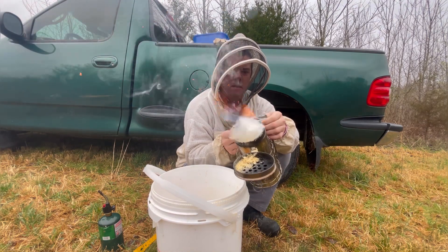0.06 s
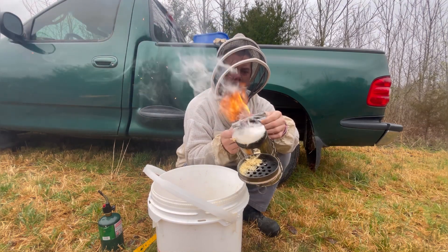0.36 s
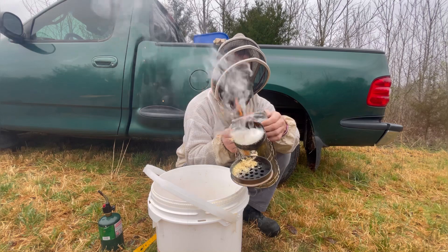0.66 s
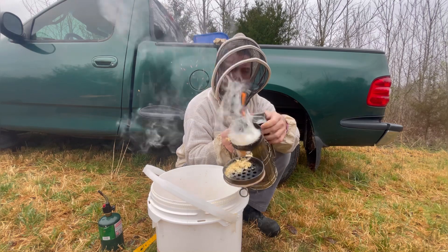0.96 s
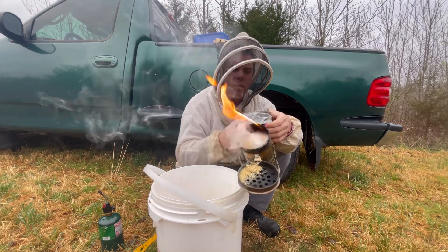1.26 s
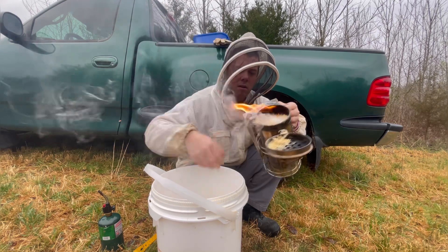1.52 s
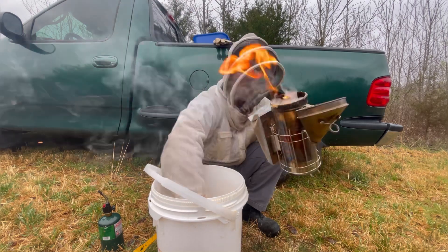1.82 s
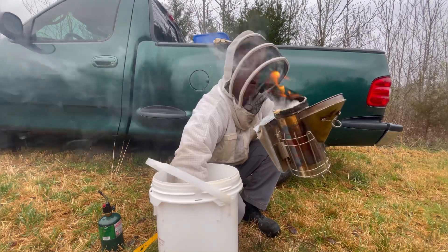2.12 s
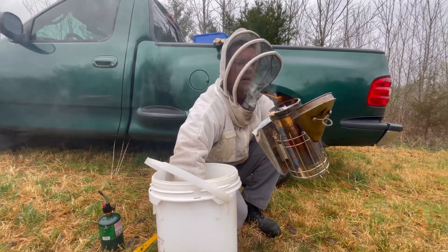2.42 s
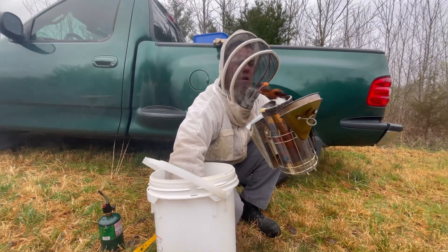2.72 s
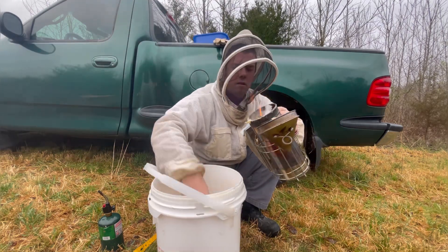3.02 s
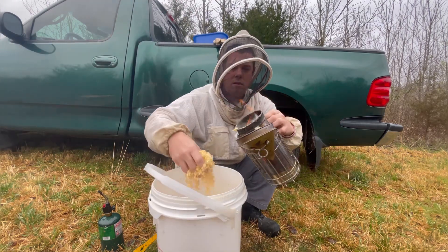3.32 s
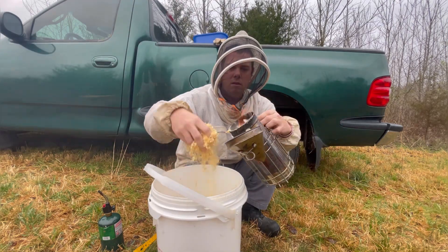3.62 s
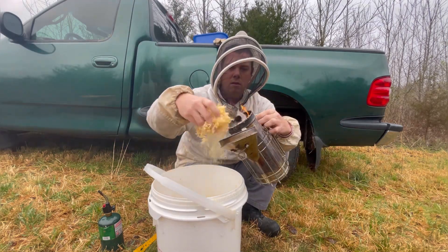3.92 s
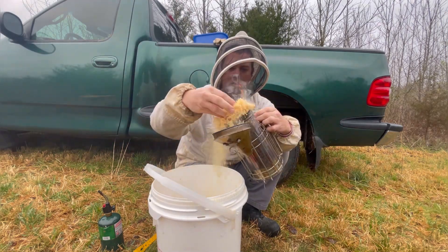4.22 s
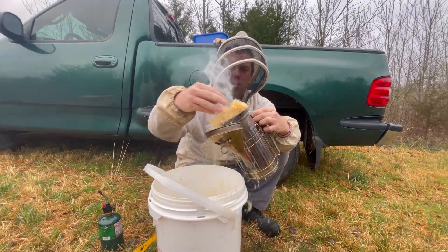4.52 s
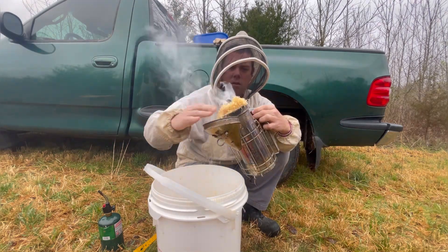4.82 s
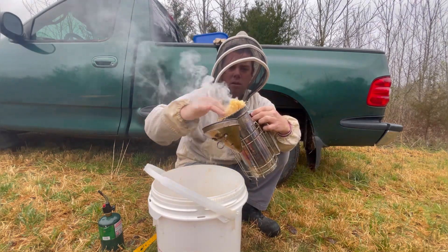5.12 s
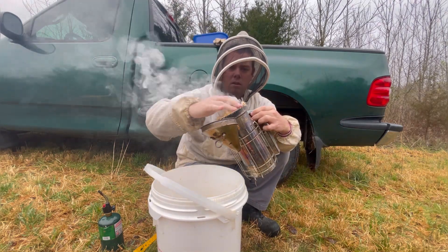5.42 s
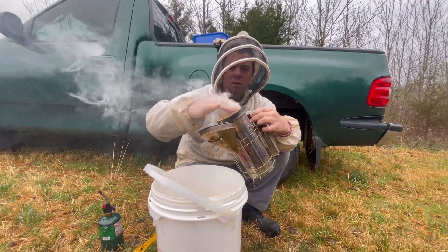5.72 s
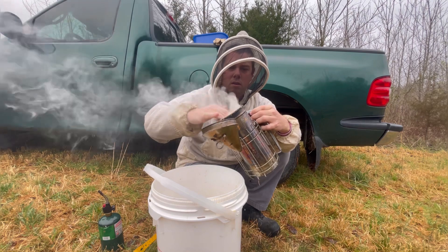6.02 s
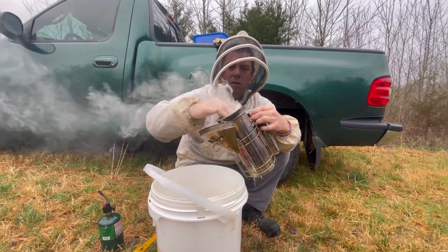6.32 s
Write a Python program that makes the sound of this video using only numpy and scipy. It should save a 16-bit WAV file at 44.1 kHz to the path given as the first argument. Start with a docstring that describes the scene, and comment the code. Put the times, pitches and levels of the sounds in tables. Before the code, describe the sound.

Close by outdoors, the bellows of a bee smoker puff three times in quick succession, each rush of air followed by a low flare of fire. The metal can and its lid clink and knock. A hand then softly scoops dry wood shavings from a plastic bucket, lets some patter back and presses the rest into the can. The lid drops shut with a short ring. Distant traffic rumbles throughout.

```python
"""Outdoors, close to a bee smoker being lit, in stereo from a microphone with two ports.
Three quick squeezes of the bellows blow air through the fire, which flares after each. The tin can and
its hinged lid clink and ring; a hand scoops dry wood shavings from a plastic bucket and packs them in,
and the lid drops shut. In the distance, traffic rumbles under a faint hiss of open air."""
import sys
import numpy as np
from scipy import signal
from scipy.fft import rfft, irfft
from scipy.io import wavfile
from scipy.ndimage import map_coordinates

SR = 44100
rng = np.random.default_rng(int(sys.argv[2]) if len(sys.argv) > 2 else 0)


def materialize(psi):
    """Save the field psi as 16-bit PCM at rate SR to the path in sys.argv[1].

    A 1-D psi becomes a single channel; in a 2-D psi each row is a channel.
    """
    bounded = np.clip(np.atleast_2d(psi).T, -1, 1)
    quanta = np.round(bounded * 32767).astype(np.int16)
    wavfile.write(sys.argv[1], SR, quanta)


N = 280514

# How alike the ports hear near and diffuse sound. Each row: frequency in Hz, likeness from -1 to 1.
NEAR = [(250, 1), (700, 0.85), (1600, 0.85), (3500, 0.73), (8500, 0.12), (10000, 1), (13000, 1)]
DIFFUSE = [(120, 0.91), (260, 0.76), (430, -0.31), (620, 1), (800, 0.18), (1100, -0.84), (2000, 0.24),
           (3000, -0.12), (8500, 0.26), (10000, 0.98), (13000, 1)]
# Spectra of an airy hiss, a crisp rustle and a soft rustle. Each row: frequency in Hz, relative dB.
AIRY_HISS = [(200, 5.5), (600, -1), (1000, 0), (1600, 2.5), (2400, -5), (3300, -11), (7000, -17.5),
             (13000, -31.5)]
CRISP_RUSTLE = [(800, -22), (2000, 2), (3000, -2), (4000, -2), (5600, 1), (7500, 0.5), (11000, 2),
                (12000, -9.5), (13000, -22)]
SOFT_RUSTLE = [(300, 12.5), (650, -4.5), (1100, 5), (2200, 1), (4000, 0.5), (6500, -2.5), (9000, -1.5),
               (11000, -7.5), (13000, -23)]


def from_db(db):
    """Decibels to gain."""
    return 10 ** (np.asarray(db) / 20)


def rms_one(x):
    """Scale to unit power."""
    return x / np.sqrt(np.mean(x ** 2) + 1e-20)


def in_time(rows):
    """Each column of a curve, sample by sample."""
    s, *columns = np.transpose(rows)
    return [np.interp(np.arange(N) / SR, s, c) for c in columns]


def per_bin(points):
    """A table over log frequency, read at every Fourier bin."""
    hz, value = np.transpose(points)
    return np.interp(np.log(np.arange(N // 2 + 1) * SR / N + 1), np.log(hz), value)


def white():
    """Two unrelated white noises."""
    return rng.standard_normal((2, N))


def colour(pair, spectrum, likeness):
    """Two unrelated signals become left and right, rms 1. Each spectrum row: Hz, relative dB."""
    mid, side = rfft(pair) * from_db(per_bin(spectrum))
    alike = np.clip(per_bin(likeness), -.995, .995)
    return rms_one(irfft(np.sqrt(1 + alike) * mid + np.sqrt(1 - alike) * side * [[1], [-1]], N))


def resonate(x, resonances):
    """Lift the sound round each resonance. Each row: centre in Hz, width in Hz, boost in dB."""
    return x + sum((from_db(db) - 1) * signal.lfilter(*signal.iirpeak(hz, hz / width, fs=SR), x)
                   for hz, width, db in resonances)


def drift(rate):
    """A random wander of rms 1 that changes course rate times a second."""
    knots = rng.standard_normal(8192)
    return rms_one(map_coordinates(knots, [np.arange(N) / SR * rate], order=1, mode="wrap"))


def swell(s, half_s):
    """A bell-shaped rise and fall."""
    return np.exp(-.5 * ((np.arange(N) / SR - s) / half_s) ** 2)


def held(start_s, end_s, attack_s, release_s):
    """A smooth rise to one, a hold and an exponential release."""
    t = np.arange(N) / SR
    return np.exp(-(np.maximum(start_s - t, 0) / attack_s) ** 2 - np.maximum(t - end_s, 0) / release_s)


def strikes(times, levels_db):
    """One click for each contact."""
    clicks = np.zeros(N)
    clicks[np.clip(np.round(np.asarray(times) * SR).astype(int), 0, N - 1)] = from_db(levels_db)
    return clicks


def fade(clicks, t60):
    """Each click starts a decay of 60 dB in t60 seconds."""
    return signal.lfilter([1], [1, -from_db(-60 / (t60 * SR))], clicks + 1e-18)


def ring(times, levels_db, modes, spread_db):
    """Every contact rings every mode; its strength scatters by spread_db at each port."""
    out = np.zeros((2, N))
    for hz, mode_db, t60 in modes:
        r, w = from_db(-60 / (t60 * SR)), 2 * np.pi * hz / SR
        scatter_db = spread_db * rng.standard_normal((len(times), 2))
        clicks = np.array([strikes(times, levels_db + mode_db + db) for db in scatter_db.T])
        polarity = rng.choice([-1, 1])
        out += polarity * signal.lfilter([0, np.sin(w)], [1, -2 * r * np.cos(w), r * r], clicks + 1e-18)
    return out


def bellows():
    """Air rushes through the can, the fire flares and ends in a deep whump; then the bellows refill."""
    # Squeezes. Each row: peak in seconds, half length in seconds, air in dB, flame in dB.
    squeezes = [(0.013, 0.039, -41.5, -32), (0.388, 0.035, -40.5, -29), (0.753, 0.03, -37.5, -30.5)]
    # The bellows spring open. Each row: peak in seconds, half length in seconds, level in dB.
    intakes = [(0.213, 0.048, -53.5), (0.582, 0.045, -53.5), (0.994, 0.11, -58)]
    # Air resonances of the can. Each row: centre in Hz, width in Hz, boost in dB.
    nozzle = [(400, 58, -1.5), (937, 120, 4.5), (1543, 80, 5.5), (2410, 100, 5.5)]
    # Spectra of the air jet, the flare and the whump. Each row: frequency in Hz, relative dB.
    jet_spectrum = [(150, -23.5), (400, 14), (640, 1.5), (780, 1), (1000, 2), (1400, 0.5), (1700, 1),
                    (2100, -5.5), (3000, -10.5), (5000, -21), (8000, -24), (11000, -27.5), (13000, -65)]
    flare_spectrum = [(30, -28), (70, 3), (130, -4.5), (240, -0.5), (340, -5), (430, -14), (560, -20),
                      (1000, -30), (3000, -76)]
    whump_spectrum = [(30, -22), (80, 15), (200, -1.5), (350, -12), (800, -56)]
    flow = sum(from_db(db) * swell(s, half) for s, half, db, _ in squeezes)
    flare = sum(from_db(db) * swell(s + .022, half_s=.031) for s, _, _, db in squeezes)
    whump = sum(from_db(db - 5.5) * swell(s + .057, half_s=.037) for s, _, _, db in squeezes)
    refill = sum(from_db(db) * swell(s, half) for s, half, db in intakes)
    turbulence = from_db(1.1 * drift(150))
    jet = flow * turbulence * colour(resonate(white(), nozzle), jet_spectrum, NEAR)
    fire = flare * colour(white(), flare_spectrum, NEAR) + whump * colour(white(), whump_spectrum, NEAR)
    return jet + fire + refill * colour(white(), AIRY_HISS, NEAR)


def open_flame():
    """The burning shavings flutter with a soft low roar, then die down."""
    hold_s, fall_db_per_s = 1.54, 6.5
    spectrum = [(60, 1), (170, 4.5), (260, -1), (380, -10), (520, -17), (900, -19.5), (3000, -76)]
    level_db = -54 - fall_db_per_s * np.maximum(np.arange(N) / SR - hold_s, 0)
    return from_db(level_db + 2.6 * drift(12)) * colour(white(), spectrum, NEAR)


def engine(hz, db, waver_hz, waver_db):
    """The wavering firing tone of a far engine."""
    gain = from_db(db + waver_db * drift(7.3))
    return gain * np.sin(2 * np.pi * np.cumsum(hz + waver_hz * drift(11)) / SR)


def far_traffic():
    """A distant road rumbles; one engine drones, and another comes in and steadily gathers speed."""
    # Loudness of the road. Each row: time in seconds, relative level in dB.
    road_levels = [(1.1, -43), (1.95, -42), (3.66, -43.5), (6.36, -43.5)]
    # Spectrum of the road. Each row: frequency in Hz, relative dB.
    road_spectrum = [(20, -19), (35, -45.5), (50, -1.5), (62, -3.5), (90, 1), (130, -4.5), (180, -14),
                     (250, -21), (350, -34.5), (480, -57), (1000, -86)]
    # The droning engine. Each row: time in seconds, firing rate in Hz, level in dB.
    drone_curve = [(0, 72.05, -46), (1.6, 71.23, -42.5), (2.9, 68.43, -46), (3.5, 65, -55.5),
                   (4.6, 66.16, -49), (6.36, 68.2, -51)]
    climb_start_s, fade_in_s, climb_hz, climb_hz_per_s = 3.2, .84, 114.9, 17.7
    road_db, = in_time(road_levels)
    rumble = from_db(road_db - 2.22 + 1.34 * drift(6)) * colour(white(), road_spectrum, DIFFUSE)
    drone = engine(*in_time(drone_curve), waver_hz=1.58, waver_db=1)
    since_s = np.arange(N) / SR - climb_start_s
    climb = engine(climb_hz + climb_hz_per_s * np.maximum(since_s, 0), db=-57, waver_hz=1.51, waver_db=3)
    return rumble + drone + np.clip(1 + since_s / fade_in_s, 0, 1) * climb


def open_air():
    """A faint, steady hiss from all round the microphone."""
    # Spectrum of the hiss. Each row: frequency in Hz, relative dB.
    spectrum = [(200, 4), (480, -6.5), (620, 3), (800, 1), (1100, 6.5), (1450, 5), (2000, -4.5),
                (2450, -6.5), (2780, -1.5), (3150, -17), (7000, -23), (10500, -21.5), (13000, -72)]
    return from_db(-66.5) * colour(white(), spectrum, DIFFUSE)


def knocks():
    """Soft blows ring the hollow bellows and bucket; the bellows board slaps drily against the can."""
    # Dull blows and board slaps. Each row: start in seconds, relative level in dB.
    thuds = [(0.137, -47), (0.174, -38), (0.282, -50.5), (0.546, -46.5), (0.935, -34.5), (1.506, -48.5),
             (1.706, -47), (2.021, -53.5), (2.386, -59), (5.618, -57), (6.317, -49)]
    slaps = [(0.9136, -34), (0.9365, -31), (0.94, -48), (0.9442, -33.5), (1.509, -58)]
    # Hollow modes. Each row: frequency in Hz, relative dB, seconds to fall 60 dB.
    modes = [(171, 3.5, 0.069), (252, -2, 0.062), (333, -1, 0.11), (400, -7.5, 0.065), (534, -6.5, 0.037)]
    board_spectrum = [(150, -15), (330, 3), (560, 7), (900, -12), (1300, 4.5), (1750, -27),
                      (2500, -8), (3500, -35), (8000, -47)]
    slap = fade(strikes(*np.transpose(slaps)), t60=.027) * colour(white(), board_spectrum, NEAR)
    return slap + from_db(1.5) * ring(*np.transpose(thuds), modes, spread_db=0)


def metal(hits, modes, crack_db, wash_db, ring_db):
    """Each contact is a sharp tick, a brief sizzle of thin sheet metal and the ring of its modes."""
    s, tick_db, blow_db = np.transpose(hits)
    ticks = strikes(s, tick_db + crack_db)
    spectrum = [(700, -35), (2000, -11), (4000, -1.5), (7000, 4), (10000, 1.5), (13000, -1.5)]
    tick_and_sizzle = fade(ticks, t60=.013) + from_db(-18.5) * fade(ticks, t60=.1)
    crack = tick_and_sizzle * colour(white(), spectrum, NEAR)
    # the many weak modes between the strong ones merge into a wash
    wash = fade(strikes(s, blow_db + wash_db), t60=.16) * colour(white(), AIRY_HISS, NEAR)
    return crack + wash + ring(s, blow_db + ring_db, modes, spread_db=2.5)


def tin_can():
    """The can and its hinge clink close to the microphone."""
    # Metal contacts. Each row: start in seconds, tick and ring in relative dB.
    clinks = [(0.179, -40, -56), (0.2735, -36.5, -42), (0.5817, -40.5, -67), (0.6376, -50, -73),
              (0.6865, -64, -51.5), (0.9106, -55, -43.5), (0.9173, -26, -39.5), (0.925, -27, -46),
              (0.9343, -41, -46), (0.9592, -32, -40), (0.9794, -40, -46), (1.054, -32, -43.5),
              (1.0674, -46, -53), (1.4228, -37, -54.5), (1.4468, -43, -62), (1.505, -35.5, -45.5),
              (1.5274, -61, -55), (1.845, -39.5, -67.5), (2.0118, -59, -64.5), (5.6935, -47, -64)]
    # Modes of the can. Each row: frequency in Hz, relative dB, seconds to fall 60 dB.
    modes = [(546, -13, 0.13), (760, -23, .06), (880, -11, 0.06), (1140, -21, 0.015), (1305, -13, 0.33),
             (1480, -24, 0.21), (1596, -6.5, 0.078), (1770, -1.5, 0.033), (1950, -5.5, 0.041),
             (2140, -4, 0.049), (2270, -15, 0.051), (2536, -9.5, 0.039), (3440, -19.5, 0.081),
             (3850, -21, .07), (5970, -15, 0.024), (9700, -13.5, 0.032)]
    return metal(clinks, modes, crack_db=-10, wash_db=-6.5, ring_db=-2)


def soft_hiss():
    """Two soft swells of airy, rustling hiss after the last squeeze of the bellows."""
    # Swells. Each row: peak in seconds, half length in seconds, level in dB.
    swells = [(1.16, 0.14, -72), (1.384, 0.054, -64.5)]
    gain = sum(from_db(db) * swell(s, half) for s, half, db in swells)
    return gain * colour(white(), SOFT_RUSTLE, DIFFUSE)


def strokes(rows, release_s):
    """Each stroke of the hand takes hold, keeps its force and lets go; gives rustle and rub in dB."""
    power = sum(np.outer(from_db([rustle_db, rub_db]), held(s, s + hold_s, attack_s, release_s)) ** 2
                for s, hold_s, attack_s, rustle_db, rub_db in rows)
    return 20 * np.log10(np.sqrt(power) + 1e-5)


def grains(per_s, size_db):
    """Tiny snaps at random moments, most weak and a few strong; rms 1."""
    born = rng.random((2, N)) < per_s / SR
    sizes = from_db(size_db * np.minimum(rng.exponential(1, (2, N)), 4))
    return rms_one(born * sizes * rng.choice([-1, 1], (2, N)))


def flakes(level_db):
    """Dry flakes snap and slide, more of them the harder the hand works."""
    per_s = 5000 * from_db(.5 * (level_db - level_db.max()))
    crackle = grains(per_s, size_db=3.5) / np.sqrt(per_s / per_s.mean())
    return (crackle + .86 * white()) * from_db(1.76 * drift(70))


def scooping():
    """Shavings rustle round the hand in the bucket, and their mass rubs with a deeper tone."""
    # Digs. Each row: time of full force, hold and attack in seconds, rustle and rub in relative dB.
    digs = [(1.77, .18, 0.05, -67, -62), (2.015, 0.009, 0.036, -64, -57), (2.06, 0.076, .03, -72, -70),
            (2.21, .1, 0.081, -80, -70.5), (2.4, 0.29, 0.1, -84, -73), (2.84, .16, 0.046, -70, -65.5),
            (3.04, 0.042, 0.049, -63, -54.5)]
    # Air resonances of the bucket. Each row: centre in Hz, width in Hz, boost in dB.
    bucket = [(1110, 500, 14), (1630, 39, 1.2), (1900, 130, 7.1), (2320, 100, 5.1), (3170, 280, 3.6),
              (5400, 760, 3.2)]
    # Spectrum of the rub. Each row: frequency in Hz, relative dB.
    rub_spectrum = [(250, 4), (550, -5.5), (1000, -0.5), (1500, 1), (2300, -7.5), (3200, -6), (6000, -36)]
    crisp_db, rub_db = strokes(digs, release_s=.03) + 1.5
    crisp = colour(resonate(flakes(crisp_db), bucket), CRISP_RUSTLE, DIFFUSE)
    rub = colour(resonate(grains(per_s=3000, size_db=3.5), bucket), rub_spectrum, DIFFUSE)
    return from_db(crisp_db) * crisp + from_db(rub_db) * rub


def snaps():
    """Single stiff flakes break with a short dry crack."""
    # Breaks. Each row: start in seconds, level in dB.
    breaks = [(2.078, -63), (2.243, -65), (2.256, -71), (2.266, -67), (4.523, -68), (4.584, -68)]
    spectrum = [(1200, -20), (3500, 8), (7000, -1), (12000, -26)]
    return fade(strikes(*np.transpose(breaks)), t60=.017) * colour(white(), spectrum, DIFFUSE)


def spilling():
    """Loose flakes fall from the lifted handful and patter back into the bucket."""
    # Flow of flakes. Each row: time in seconds, relative level in dB.
    trickle = [(3.15, -88), (3.338, -75), (3.414, -80.5), (3.636, -70.5), (3.702, -79), (4.052, -70.5),
               (4.28, -85.5)]
    flow_db, = in_time(trickle)
    falling = held(trickle[0][0], trickle[-1][0], attack_s=.044, release_s=.044)
    patter = grains(per_s=2700, size_db=1) + .9 * white()
    return falling * from_db(flow_db - 1) * colour(patter, CRISP_RUSTLE, DIFFUSE)


def packing():
    """Each press crushes shavings in the mouth of the can; where they scrape the wall, it sounds hollow."""
    # Presses. Each row: time of full force, hold and attack in seconds, rustle and scrape in relative dB.
    presses = [(4.36, .055, 0.055, -71.5, -74), (4.46, .14, 0.062, -79.5, -80),
               (4.955, 0.062, .022, -68, -57), (5.41, .035, .018, -66.5, -65), (5.6, 0.023, .04, -68, -83),
               (5.695, .048, 0.014, -63.5, -70), (5.945, 0.078, 0.023, -66.5, -63),
               (6.08, .025, .03, -83, -79), (6.265, 0.011, 0.026, -64, -72)]
    # Air resonances of the can's mouth. Each row: centre in Hz, width in Hz, boost in dB.
    mouth = [(1250, 120, 5), (1840, 100, 12), (2520, 150, 7), (3470, 240, 11), (4750, 150, 6)]
    scrape_spectrum = [(400, -18), (1100, 5), (2000, 1), (3600, -10), (7000, -18), (12000, -25)]
    rustle_db, scrape_db = strokes(presses, release_s=.02)
    rustle = colour(flakes(rustle_db), SOFT_RUSTLE, DIFFUSE)
    scrape = colour(resonate(flakes(scrape_db), mouth), scrape_spectrum, DIFFUSE)
    return from_db(rustle_db + 5.5) * rustle + from_db(scrape_db - 4.5) * scrape


def lid():
    """The lid drops on the rim, bounces and rings."""
    # Hits on the rim. Each row: start in seconds, tick and ring in relative dB.
    bounces = [(6.2925, -37, -45.5), (6.2995, -60, -56), (6.3098, -39, -43), (6.3125, -67, -54),
               (6.3195, -50, -54)]
    # Modes of the lid. Each row: frequency in Hz, relative dB, seconds to fall 60 dB.
    modes = [(340, -22, 0.12), (920, -4, 0.088), (1326, -3, 0.23), (1477, -7, 0.29), (1730, -17, .07),
             (1950, -8, 0.047), (1990, -1, 0.062), (2125, -5, 0.068), (2900, -24, .06), (3530, -8, 0.053),
             (4600, -9, 0.068), (5440, 3, 0.016), (8700, -10, .04)]
    return metal(bounces, modes, crack_db=-10.5, wash_db=-9, ring_db=-5)


def scene():
    """The smoker and the shavings close by, with traffic and open air behind them."""
    smoker = tin_can() + lid() + bellows() + open_flame() + knocks() + soft_hiss()
    shavings = scooping() + spilling() + packing()
    return smoker + shavings + far_traffic() + open_air() + snaps()


def record(dry):
    """The microphone's ports differ in level and phase and share a treble resonance; the top is cut."""
    # Balance of the ports. Each row: frequency in Hz, left minus right in dB.
    balance = [(60, 6.3), (380, 5), (530, 7), (850, 1.5), (1300, 2), (2100, 4.5), (3400, 7), (5500, 7.5),
               (7200, 2), (8500, -2.5), (10000, .5), (13000, .5)]
    # Phase between the ports. Each row: frequency in Hz, lead of the left in radians.
    phase = [(30, .2), (200, .45), (340, .8), (430, 1.5), (530, 3.4), (740, 4.1), (900, 5.4), (1800, 6.0),
             (3100, 7.5), (4500, 7), (5400, 4), (6300, 6.7), (7300, 6.1), (8200, 8.7), (9000, 4.3),
             (10200, 3.1), (11000, 1.8), (11900, 0), (13000, -2.5)]
    cutoff_hz = 13300
    left_response = from_db(per_bin(balance) / 2) * np.exp(.5j * per_bin(phase))
    edge_fade = np.minimum(1, np.minimum(np.arange(N), np.arange(N)[::-1]) / 100)
    ports = irfft(rfft(dry * edge_fade) * np.array([left_response, 1 / left_response]), N)
    ports = resonate(ports, [(10600, 1200, 13.5)])
    return signal.sosfilt(signal.cheby2(12, 50, cutoff_hz, fs=SR, output="sos"), ports)


dry = scene()
out = record(dry)
materialize(out)
```